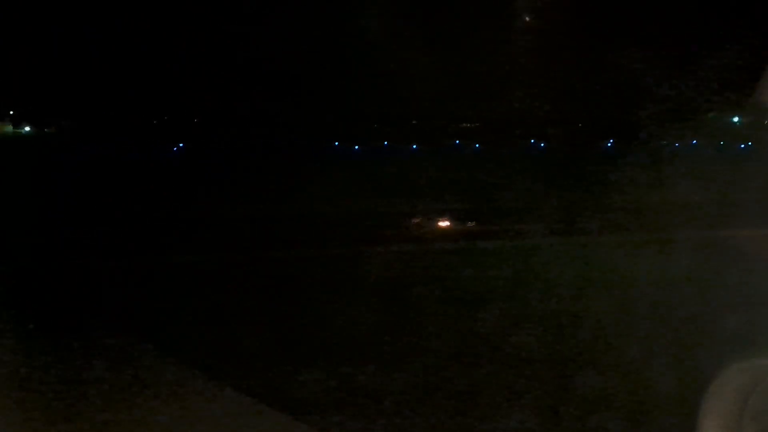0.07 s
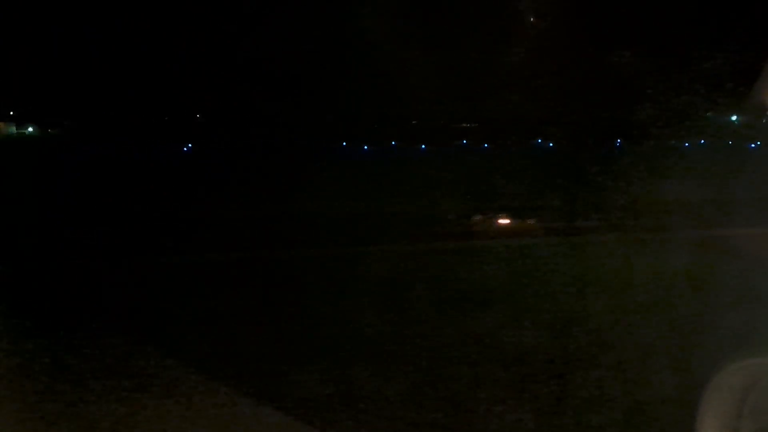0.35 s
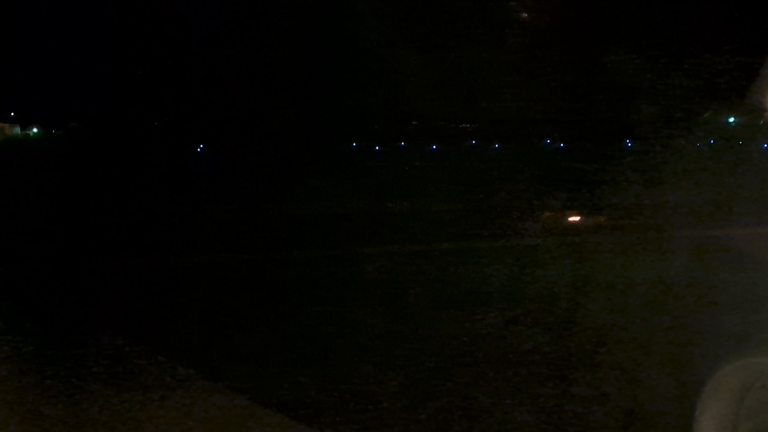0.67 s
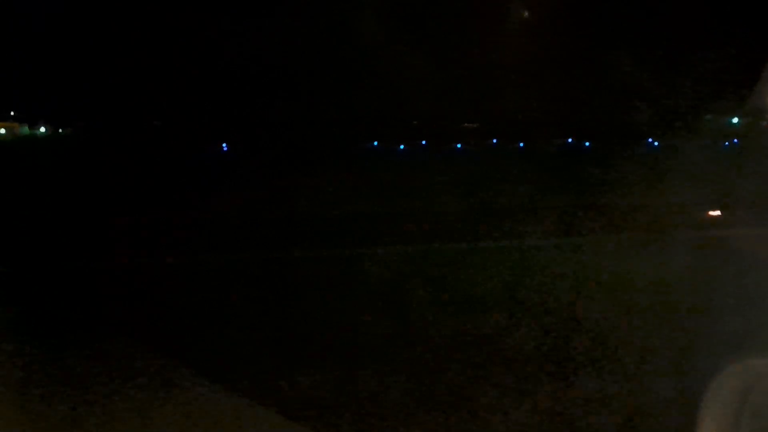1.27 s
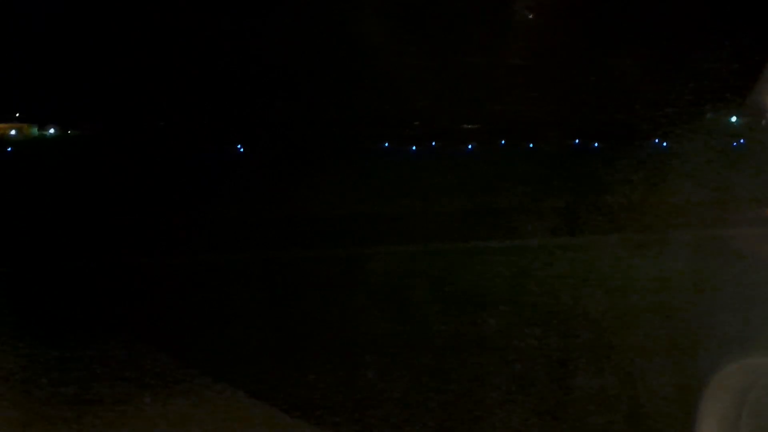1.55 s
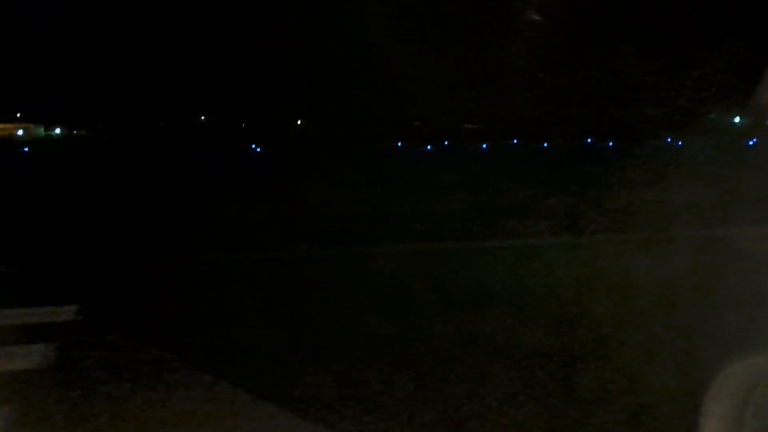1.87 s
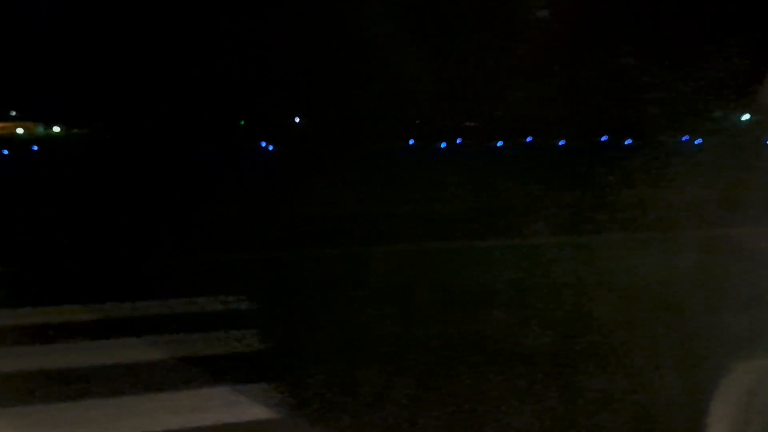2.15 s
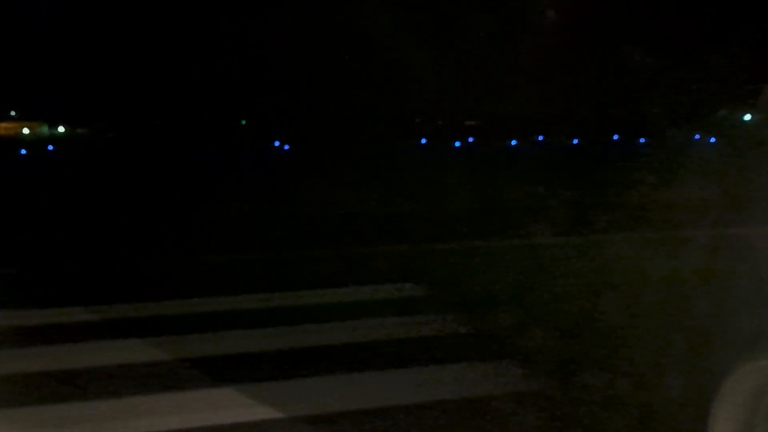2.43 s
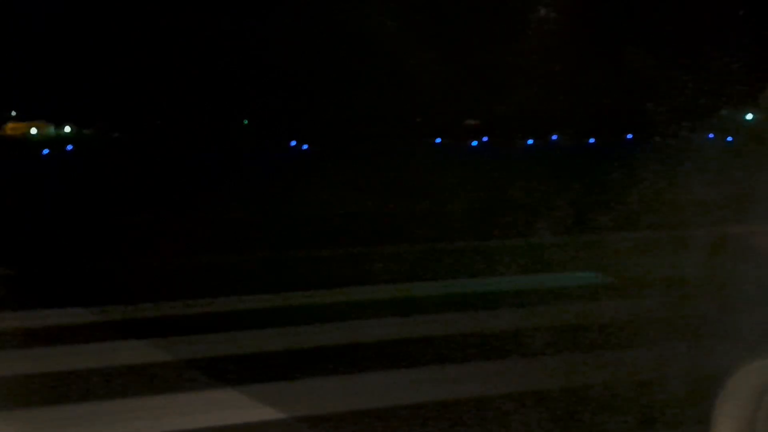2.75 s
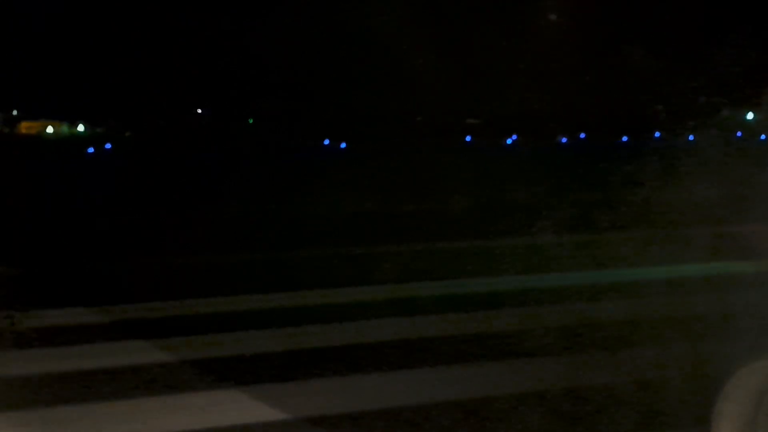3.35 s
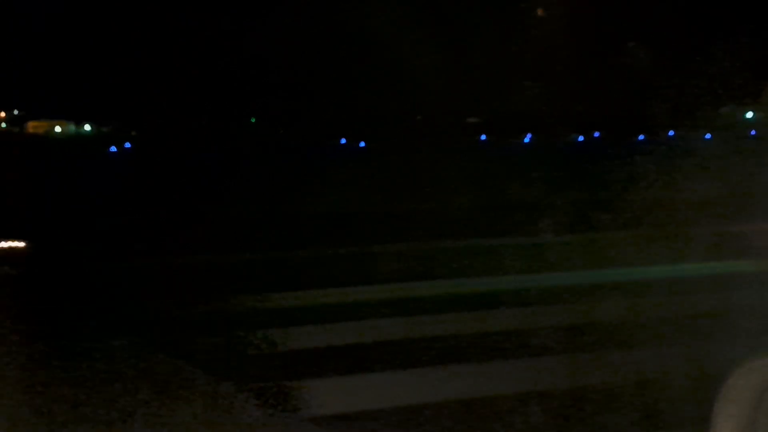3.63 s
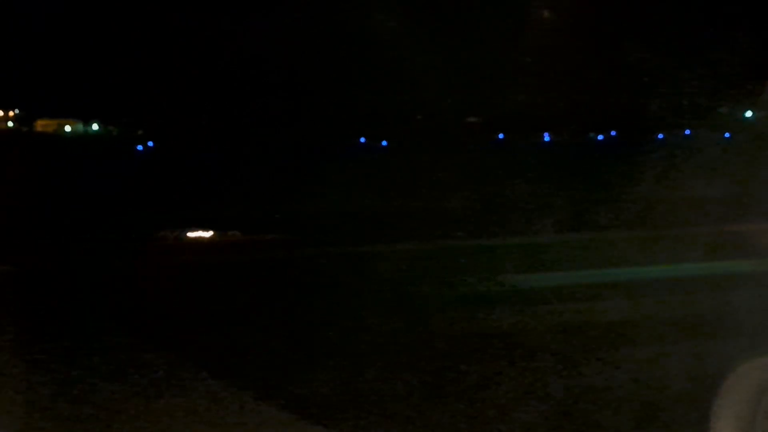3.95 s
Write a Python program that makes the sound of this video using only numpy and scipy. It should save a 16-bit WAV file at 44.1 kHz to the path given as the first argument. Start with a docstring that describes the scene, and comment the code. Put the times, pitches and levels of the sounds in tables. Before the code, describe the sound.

A jet airliner's deep rumble fills the cabin throughout as it rolls along the runway, under a soft, slowly sinking air hiss. A faint engine whine climbs, mostly on the left, giving way around 2 seconds to a faint, even buzz. Plastic trim ticks lightly now and then, most clearly just before 2 seconds. A thin high whistle swells near 2.8 seconds and eases toward 4.

```python
"""A jet airliner on the runway at night, heard on a stereo pair in the cabin as the engines spool up.
From the start, wheels and engines make the cabin rumble and boom under a hiss of air, and the fan's
blade whine climbs, mostly on the left. The trim begins to tick now and then. Around two seconds in,
the whine gives way to a faint buzz on multiples of the shaft speed. Last, near full speed, a thin
whistle swells and eases."""
import sys
import numpy as np
from scipy import signal
from scipy.fft import rfft, irfft
from scipy.io import wavfile
from scipy.ndimage import uniform_filter1d

SR = 44100
rng = np.random.default_rng(int(sys.argv[2]) if len(sys.argv) > 2 else 0)


def dump_mix(stems):
    """Bounce the given channels to the path in sys.argv[1] as a 16-bit WAV at rate SR."""
    frames = np.atleast_2d(stems).T  # one column per channel
    limited = np.clip(frames, -1, 1)  # hard clip at full scale
    pcm = np.round(limited * 32767).astype(np.int16)
    wavfile.write(sys.argv[1], SR, pcm)


N = 176400
TIME, BIN_HZ = np.arange(N) / SR, np.arange(N // 2 + 1) * SR / N


def from_db(db):
    """Decibels to gain."""
    return 10 ** (np.asarray(db) / 20)


def unit_rms(x):
    """Scale to unit power."""
    return x / np.sqrt(np.mean(np.abs(x) ** 2) + 1e-20)


def in_time(rows):
    """Each column of a table over time, read at every sample."""
    times, *columns = np.transpose(rows)
    return [np.interp(TIME, times, column) for column in columns]


def per_bin(points):
    """A table over log frequency, read at every spectral bin."""
    hz, value = np.transpose(points)
    return np.interp(np.log(BIN_HZ + 1e-9), np.log(hz), value)


def pan(db):
    """Left and right gains for a level difference, at constant power."""
    gains = np.array([from_db(db / 2), from_db(-db / 2)])
    return gains / np.sqrt(np.mean(gains ** 2, axis=0))


def resonance(offset_hz, half_width_hz):
    """Gain of a peak with steep skirts."""
    return 1 / (1 + (offset_hz / half_width_hz) ** 2)


def drift(width_hz):
    """Smooth random wander of unit spread, separate for each side."""
    step = 8
    count = N // step
    spectrum = rfft(rng.standard_normal((2, count))) * resonance(BIN_HZ[:count // 2 + 1], width_hz)
    slow = unit_rms(irfft(spectrum, count))
    return np.array([np.interp(np.arange(N) / step, np.arange(count), side) for side in slow])


def flutter(width_hz):
    """Random amplitude and phase of a turbulent tone."""
    return unit_rms(drift(width_hz) + 1j * drift(width_hz))


# How alike the cabin sounds at the two microphones: f/Hz, coherence/0..1
COHERENCE = [(60, .995), (150, .98), (220, .95), (310, .97), (370, .82), (450, .72), (620, .58), (800, .38),
             (1200, 0)]
# Lead of the left microphone: f/Hz, phase/rad
LEFT_LEAD = [(40, .4), (250, .32), (320, .17), (440, 0), (520, .65), (800, 1.05)]
# Left microphone minus right: f/Hz, level/dB
BALANCE = [(60, 0.5), (210, .5), (330, 0), (500, -3.5), (770, 4), (1170, 0), (1790, 6), (2740, 0),
           (6400, 0), (8000, 13.5), (9800, 9), (12000, 0), (15000, -.5)]

def cabin_noise(gain):
    """Noise all around the pair, alike in the bass and diffuse in the treble, at unit power."""
    mid, side = rfft(rng.standard_normal((2, N)))
    coherence, sign = per_bin(COHERENCE), np.array([[1], [-1]])
    pair = np.sqrt(1 + coherence) * mid + np.sqrt(1 - coherence) * side * sign
    pair *= np.exp(.5j * per_bin(LEFT_LEAD) * sign)
    return unit_rms(irfft(pair * gain * pan(per_bin(BALANCE)), N))


# Rolling airframe, heard from inside: f/Hz, relative level/dB
RUMBLE_SPECTRUM = [(20, -51), (30, -31), (39, -15), (50, 1), (62, 2), (76, 0), (90, -8), (102, -12),
                   (118, -11.5), (170, -10.5), (220, -15.5), (270, -13.5), (325, -18.5), (370, -25),
                   (420, -25), (500, -33), (640, -34), (800, -39.5), (1250, -50.5), (2500, -86.5)]
# Cabin resonances: f/Hz, half-width/Hz, level/dB
CABIN_BOOMS = [(57.4, 12.3, -21.5), (102.7, 5.2, -24), (132.4, 5.4, -28.5), (149.4, 4, -30),
               (314.5, 9.8, -28.5)]
# Three bands of the rumble that swell: lower f/Hz, upper f/Hz
SWELL_BANDS = [(110, 190), (250, 480), (650, 1150)]
# Their slow swells: t/s, low gain/dB, middle gain/dB, high gain/dB
SWELL_GAINS = [(0, -1.1, 1.3, -1.5), (0.549, -1.5, 3, -.5), (.8, -1, -0.5, .5), (1.6, 0.4, 1.1, 0.2),
               (2.3, 1, 0.5, 1), (2.9, 0.2, -0.3, -1.5), (3.4, -1.2, 0, -0.3), (4, 0, 0, -0.2)]
# Surges of the deepest rumble: t/s, relative level/dB
DEEP_SURGES = [(0, 4.5), (.26, -0.5), (.38, -2), (.52, 5.5), (.64, 2.5), (.77, -1.5), (.98, 5), (1.12, -4),
               (1.42, -1), (1.57, 3), (1.75, -1), (1.98, -3), (2.09, 4.5), (2.36, -1), (2.53, -1),
               (2.65, 5), (2.76, 0), (3.1, -1.5), (3.4, -5.5), (3.58, 1), (3.72, -4.5), (3.83, 5),
               (3.94, -2)]

def rumble(rolling_db=-12.5, deep_db=-15.5, deep_below_hz=82.6):
    """Wheels and engines shake the airframe and the cabin booms; bands swell and the deep bass surges."""
    booms = sum(from_db(db) * cabin_noise(resonance(BIN_HZ - hz, width)) for hz, width, db in CABIN_BOOMS)
    whole = from_db(rolling_db) * cabin_noise(from_db(per_bin(RUMBLE_SPECTRUM))) + booms
    spectrum = rfft(whole)
    for (low, high), db in zip(SWELL_BANDS, in_time(SWELL_GAINS)):
        band = irfft(spectrum * (BIN_HZ > low) * (BIN_HZ < high), N)
        whole += (from_db(db) - 1) * band
    deep = irfft(spectrum / (1 + (BIN_HZ / deep_below_hz) ** 20), N)
    power = np.mean(deep ** 2, axis=0)
    for _ in range(2):
        power = uniform_filter1d(power, size=SR // 7)
    surging = deep / np.sqrt(power) * from_db(deep_db + in_time(DEEP_SURGES)[0])
    return whole - deep + surging


# Air around the microphones: f/Hz, relative level/dB
AIR_SPECTRUM = [(500, -25.5), (1000, -7.5), (1500, 3.5), (2400, 1), (3400, -2.5), (4100, -2.5), (4800, 2),
                (5400, -3.5), (5900, -6), (7200, -8), (8500, -15.5), (10000, -17.5), (12000, -15),
                (14000, -22.5), (16000, -28)]
# Its slow fall: t/s, level/dB
AIR_LEVEL = [(0, -40.5), (.7, -42.5), (1.7, -43.5), (2.1, -45), (3, -46.5), (4, -47)]

def air_hiss():
    """A smooth hiss of air fills the cabin and slowly sinks."""
    return from_db(in_time(AIR_LEVEL)[0]) * cabin_noise(from_db(per_bin(AIR_SPECTRUM)))


# Blade tone from the engine outside: t/s, level/dB, left minus right/dB
BLADE_TONE = [(0, -48, 11), (.13, -37.5, 9), (.26, -42, -6), (.35, -44, 5), (.66, -45.5, 10),
              (.76, -35.5, 15), (.86, -37.5, 15), (.96, -36, 18), (1.04, -36.5, 8), (1.36, -36.5, 11),
              (1.45, -43.5, 13), (1.62, -43, 12), (1.69, -35, 21), (1.82, -62, 1), (2.3, -57, 3),
              (3.0, -80, 4)]
# Its harmonics: t/s, second level/dB, third level/dB
BLADE_OVERTONES = [(0, -67, -59.5), (.14, -57, -44), (.24, -64, -63), (.33, -48, -51), (.43, -52, -55),
                   (.55, -60, -58), (.68, -62, -55), (.75, -56, -46.5), (.87, -61, -58), (1.7, -68, -58),
                   (1.9, -78, -78)]
# Turbulence in the fan: t/s, level/dB
FAN_SWISH = [(0, -46), (.5, -51.5), (.85, -44.5), (1.35, -47), (1.52, -48.5), (1.72, -45), (1.85, -54),
             (2.4, -51), (3.0, -83)]

def fan_whine(shaft_angle, blades=24, rough_share=.69, swish_ratio=.89):
    """The blade-passing tone, roughened by turbulence, with overtones and a swish just below it."""
    level_db, balance_db = in_time(BLADE_TONE)
    blade_phase = blades * shaft_angle
    roughness = np.sqrt(1 - rough_share) + np.sqrt(rough_share) * flutter(width_hz=20.6)
    tone = from_db(level_db) * roughness * np.exp(1j * blade_phase) * pan(balance_db)
    for k, db in enumerate(in_time(BLADE_OVERTONES), 2):
        tone += from_db(db) * flutter(width_hz=30 * k) * np.exp(1j * k * blade_phase)
    turbulence = from_db(in_time(FAN_SWISH)[0]) * flutter(width_hz=215)
    swish = turbulence * np.exp(1j * swish_ratio * blade_phase)
    return np.sqrt(2) * (tone + swish).real


# Ticks of the trim inside the cabin: t/s, level/dB
TRIM_TICKS = [(.192, -45), (.61, -43.5), (.772, -45), (1.021, -48), (1.295, -44), (1.67, -44), (1.946, -36),
              (2.28, -48), (2.95, -43), (3.26, -40.5)]
# Their colour: f/Hz, relative level/dB
TICK_SPECTRUM = [(1200, -17), (2800, 6), (5000, 4), (8000, -7.5), (13000, -7), (16000, -38)]

def trim_ticks(attack_s=.003, decay_s=.012):
    """Plastic panels give short dry crackles, each a burst of bright noise."""
    envelope = 0
    for start, db in TRIM_TICKS:
        age = np.maximum(TIME - start, 0)
        rise = np.minimum(age / attack_s, 1)
        decay = np.exp(-np.maximum(age - attack_s, 0) / decay_s)
        envelope += from_db(db) * rise * decay
    return envelope * cabin_noise(from_db(per_bin(TICK_SPECTRUM)))


# Buzz lines at the pair: shaft multiple (rounded for pitch), left level/dB, right level/dB, full at t/s
BUZZ_LINES = [(4.1, -33.5, -30, 2.3), (8, -61, -46, 1), (9, -63, -53.5, 0.91), (11, -48.5, -61, 1.3),
              (12, -59, -56, 1.2), (13, -64, -49, 1.7), (15, -59, -65, 1.3), (16, -56, -60, 1.4),
              (17, -60, -76, 2.5), (18, -65.5, -64, 2.9), (20, -53.5, -52, 2.8), (21, -75.5, -62, 2.5),
              (22, -63.5, -61.5, 2.6), (23, -51.5, -68, 2.5), (24, -55.5, -58, 2.2),
              (26, -58.5, -57.5, 2.2), (28, -63, -57.5, 3.0), (29, -58, -60, 1.8), (30, -68, -69.5, 6.1),
              (31, -58.5, -60.5, 2.2), (32, -64.5, -58, 0.92), (33, -64.5, -61, 2), (36, -60, -65, 0.91),
              (37, -79, -66, 2.6), (40, -66, -69, 2), (42, -57.5, -62, 5.2), (52, -65, -62, 2.6),
              (56, -61, -69, 1.5), (60, -56.5, -60.5, 2.7), (61, -62, -70, 2.1), (63.3, -63, -67, 2.8)]

def blade_buzz(shaft_angle, top_speed_hz, rise_db_per_s=21.5, waver_db=2, gain_db=-1):
    """Uneven blades sound clean lines on the shaft's multiples; they come in one by one and waver."""
    lines = 0
    for multiple, left_db, right_db, full_s in BUZZ_LINES:
        rise_db = rise_db_per_s * np.minimum(TIME - full_s, 0)
        gain = from_db(np.array([[left_db], [right_db]]) + rise_db + waver_db * drift(width_hz=1.3))
        coherence = np.interp(multiple * top_speed_hz, *np.transpose(COHERENCE))
        right_lag = np.arccos(coherence) * np.array([[0], [1]])
        lines += gain * np.sin(round(multiple) * shaft_angle + rng.uniform(0, 2 * np.pi) - right_lag)
    return np.sqrt(2) * from_db(gain_db) * lines


# High whistle, a little to the left: t/s, level/dB
WHISTLE_LEVEL = [(2.2, -85), (2.6, -70), (2.78, -53.5), (3.0, -58), (3.4, -58), (4, -63)]

def whistle(shaft_angle, multiple=64, balance_db=3):
    """A thin clean tone on one multiple of the shaft speed swells near full speed, then eases."""
    amplitude = np.sqrt(2) * from_db(in_time(WHISTLE_LEVEL)[0])
    return amplitude * np.sin(multiple * shaft_angle) * pan(balance_db)[:, None]


# Fan shaft spooling up: t/s, f/Hz
SHAFT_SPEED = [(0, 64.8), (.15, 66.7), (.3, 69.2), (.5, 72.5), (.8, 74.6), (1.25, 74.9), (1.75, 76.0),
               (2.0, 77.0), (2.5, 78.3), (3.0, 79.09), (3.5, 79.31), (4, 79.43)]

def scene():
    """From inside the cabin: one shaft drives whine, buzz and whistle over rumble, air and ticks."""
    speed_hz, = in_time(SHAFT_SPEED)
    shaft_angle = 2 * np.pi * np.cumsum(speed_hz) / SR
    opening = rumble() + air_hiss() + fan_whine(shaft_angle)
    buzz = blade_buzz(shaft_angle, top_speed_hz=SHAFT_SPEED[-1][1])
    return opening + trim_ticks() + buzz + whistle(shaft_angle)


def record(dry, cutoff_hz=15750, fade_s=.004):
    """The recorder cuts the top steeply; a very short fade closes the sound."""
    samples_left = np.arange(N)[::-1]
    fade = np.sin(np.pi / 2 * np.minimum(samples_left / (fade_s * SR), 1)) ** 2
    lowpass = signal.ellip(10, .1, 80, cutoff_hz, fs=SR, output="sos")
    return signal.sosfilt(lowpass, dry * fade)


dry = scene()
out = record(dry)
dump_mix(out)
```